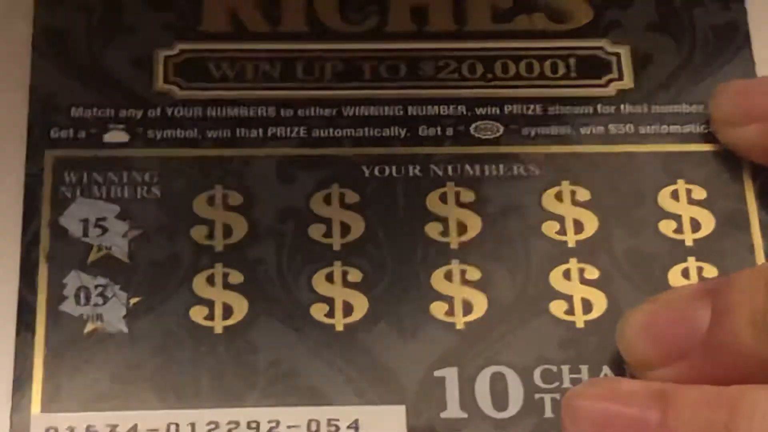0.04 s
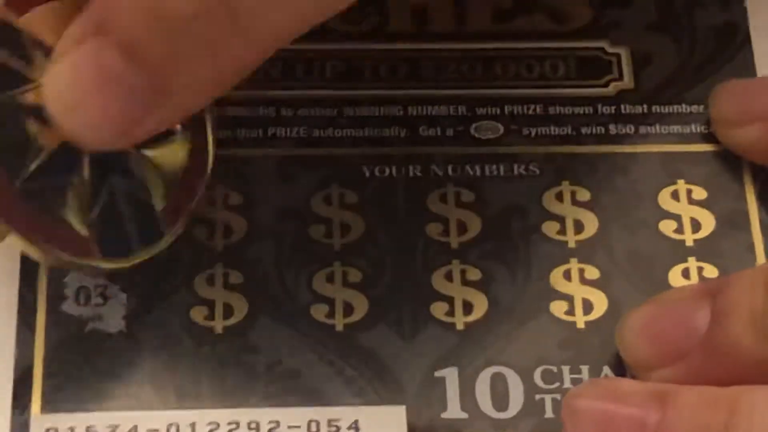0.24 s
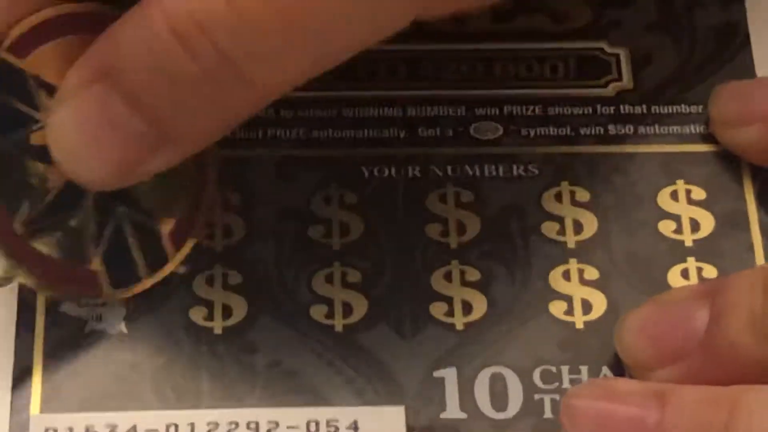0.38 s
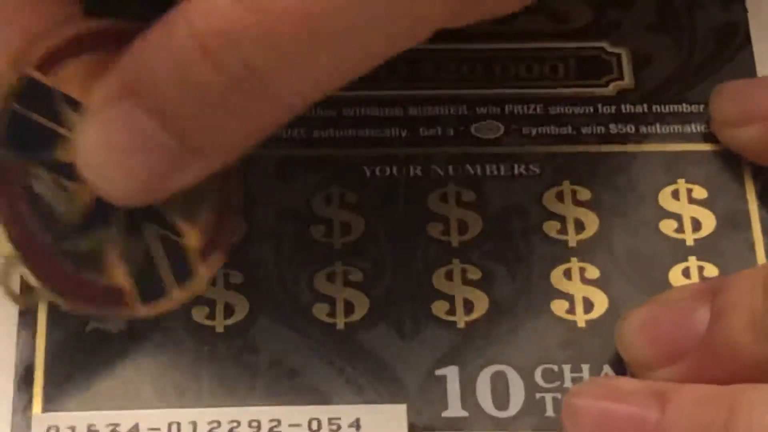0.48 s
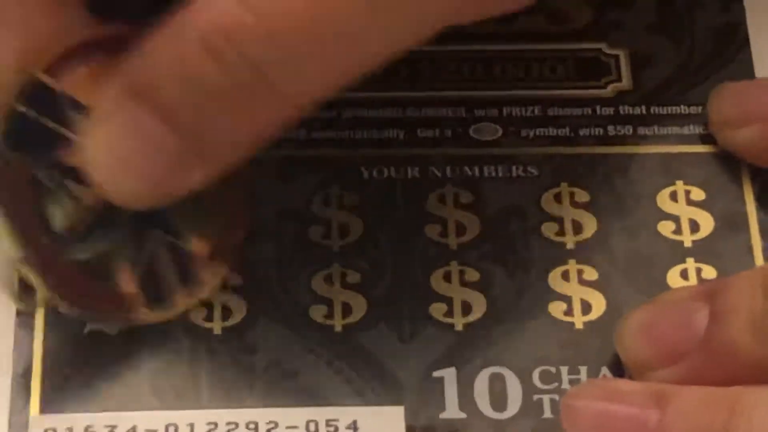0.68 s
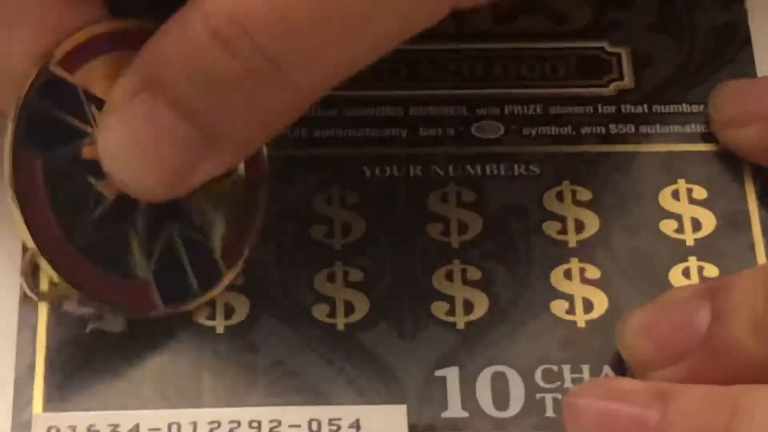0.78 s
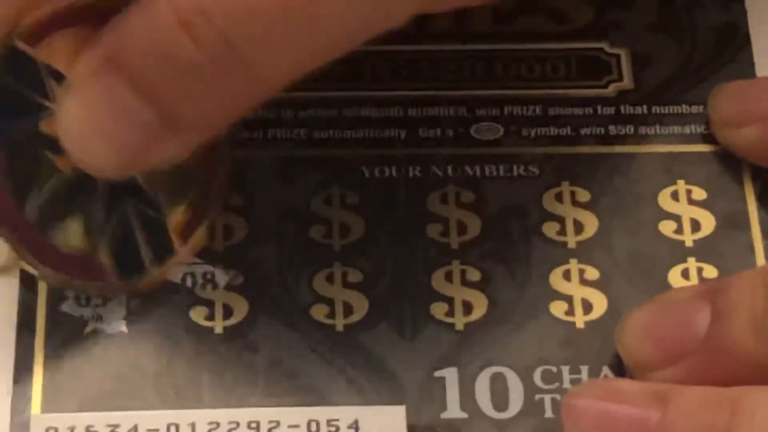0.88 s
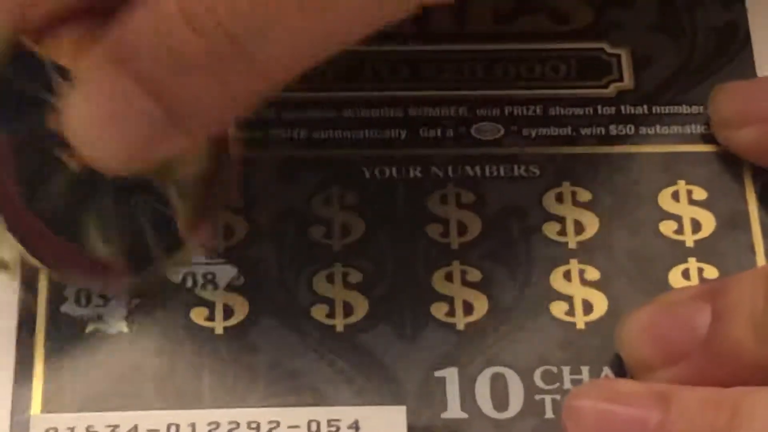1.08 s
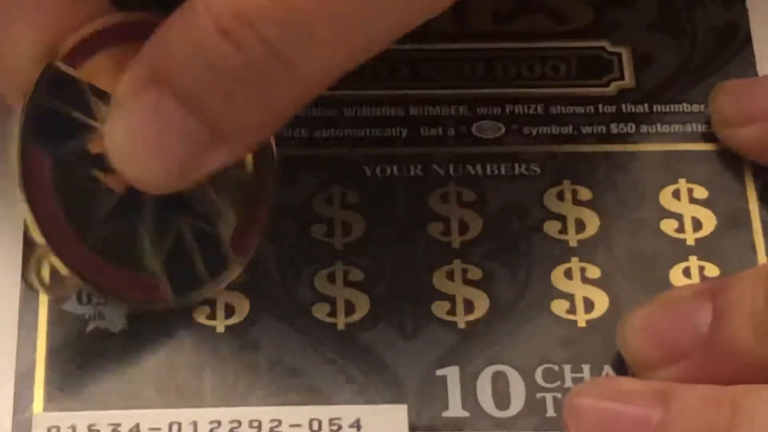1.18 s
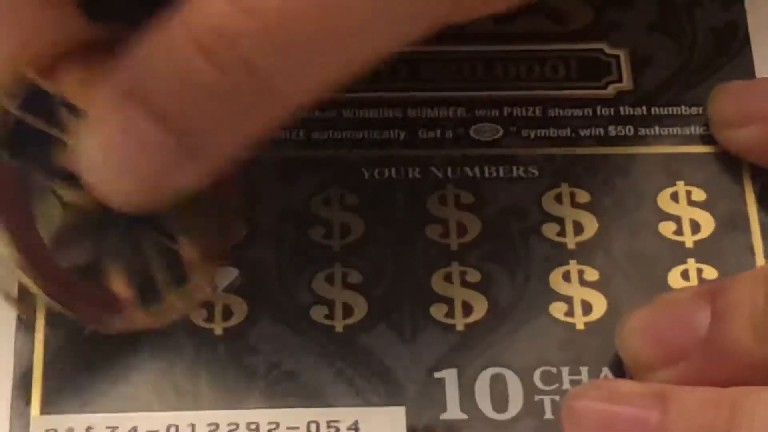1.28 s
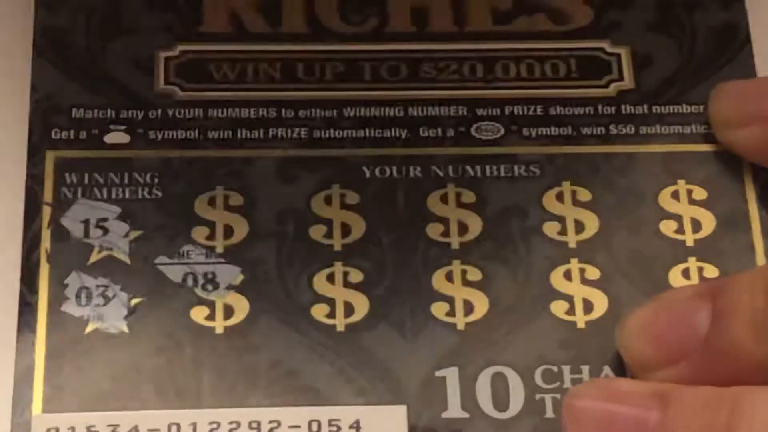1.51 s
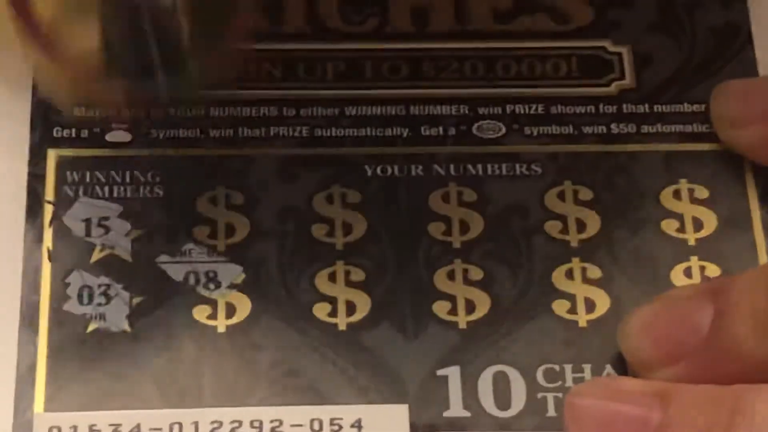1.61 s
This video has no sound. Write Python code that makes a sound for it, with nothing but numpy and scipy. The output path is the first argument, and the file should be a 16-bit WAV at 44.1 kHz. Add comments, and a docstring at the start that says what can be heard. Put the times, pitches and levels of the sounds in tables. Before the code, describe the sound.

Coin scraping on card: after a moment of quiet room hum comes a sharp tap, then rapid uneven rasps with small ticks, then faint sliding over paper, heard close up in a small room.

```python
"""A steady room hum with a faint narrow drone is heard first; then a large coin, held under a thumb,
taps down on a paper card lying on a table and scrapes it in quick short strokes, with soft slides later.
Hum and slides are filtered noise; taps are decaying noise bursts and pulses sent through resonances.
In the strokes, dense grains of friction ring the damped coin, the card and the table;
a small room answers taps, strokes and slides with a tail of decaying noise."""
import sys
import numpy as np
from scipy import signal
from scipy.fft import rfft, irfft, next_fast_len
from scipy.io import wavfile
from scipy.ndimage import uniform_filter1d, map_coordinates

SR = 44100
rng = np.random.default_rng(int(sys.argv[2]) if len(sys.argv) > 2 else 0)


def unload_wav(signal):
    """Save mono or channel-first audio to the path in sys.argv[1] as 16-bit WAV at rate SR, clipped to [-1, 1]."""
    wavfile.write(
        sys.argv[1],
        SR,
        np.round(np.clip(np.atleast_2d(signal).T, -1, 1) * 32767).astype(np.int16),
    )


N = 72765

# Spectrum of the room's steady background: [f/Hz, relative level/dB per Hz]
HUM_SPECTRUM = [(15, -53), (30, -18), (60, -1), (130, 0), (180, -14), (250, -2.5), (450, -12), (800, -6.5),
                (1200, -12.5), (2000, -21.5), (3500, -31), (8000, -37.5), (16000, -42.5)]
# Narrow steady band, resonance applied twice: [f/Hz, width/Hz, level/dB]
DRONE_MODE = [(645.6, 20, 0)]
# Taps and ticks of the coin: [t/s, table level/dB, card level/dB, knock level/dB, crack level/dB];
# table and card levels are those before the blow is doubled
TAPS = [(0.2406, -47.5, -25, -19.5, -30.5), (0.252, -80, -31.5, -83, -65), (0.597, -70, -54, -45, -53),
        (0.621, -55.5, -53, -66, -55), (0.645, -73, -76, -54, -55), (0.825, -58, -50, -47, -69),
        (0.844, -59, -79, -75, -53.5), (1.027, -70, -73, -73, -75), (1.0516, -90, -69, -87, -52.5),
        (1.075, -57, -74, -64, -55), (1.089, -66, -56, -72, -74), (1.1347, -68, -77, -77, -53),
        (1.293, -98, -83, -62, -64), (1.519, -69, -63, -88, -52.5), (1.5943, -60.5, -93, -53, -59)]
# Dull body of a blow, resonances applied twice: [f/Hz, width/Hz, level/dB, counting double]
KNOCK_MODES = [(420, 167, 3.5), (1120, 1340, 0), (1970, 810, 3), (4640, 930, -10)]
# Spectrum of the sharp crack of a blow: [f/Hz, level/dB]
CRACK_SPECTRUM = [(1500, 4), (3000, 5), (4500, -0.5), (8000, -9), (13000, -5.5), (16000, -17.5)]
# Decay of the room's answer: [f/Hz, t60/s]
ROOM_T60 = [(100, 0.31), (1000, 0.18), (4000, 0.31), (14000, 0.12)]
# Colour of the room's answer, hollowed around 6 kHz and brighter again at the top: [f/Hz, level/dB]
ROOM_COLOUR = [(300, 1.5), (2500, -1), (6000, -12), (15000, -2.5)]
# Strokes: [start t/s, length/s, place of peak speed/0-1, delay until the coin's edge bites/s,
# then level/dB of table, card, card edge, coin's lowest mode, coin's upper modes]
STROKES = [(0.302, 0.042, 0.05, 0.0021, -52.5, -46.5, -64.5, -62.5, -66.5),
           (0.388, 0.07, 0.07, 0.00043, -48.5, -45.5, -49.5, -58, -57),
           (0.491, 0.057, 0.53, 0.0013, -55.5, -48, -58, -54.5, -56.5),
           (0.543, 0.023, 0.13, 0.0022, -76, -47.5, -59, -52, -56),
           (0.59, 0.024, 0.22, 0.0015, -55.5, -49.5, -49, -57, -56),
           (0.613, 0.049, 0.12, 0.0048, -50, -48.5, -49.5, -56, -60),
           (0.702, 0.066, 0.53, 0.002, -52.5, -47, -54.5, -49, -51),
           (0.781, 0.079, 0.88, .01, -58.5, -50.5, -59.5, -69, -67.5),
           (0.899, 0.078, 0.58, 0.006, -53, -45.5, -54.5, -50, -51),
           (1.017, 0.062, 0.67, 0.0054, -53, -47.5, -57.5, -64, -66.5),
           (1.118, 0.072, 0.77, 0.0017, -61.5, -56.5, -69, -67, -73.5),
           (1.212, 0.061, 0.35, 0.0098, -50, -45, -49.5, -56, -58)]
# Resonances of the table: [f/Hz, width/Hz, level/dB]
TABLE_MODES = [(81, 34, -11), (129.6, 8.8, -2.5), (225.4, 17.8, 3), (324, 40.6, -1.5), (402.5, 52, -3.5),
               (524, 30, -5.5)]
# Resonances of the card: [f/Hz, width/Hz, level/dB]
CARD_MODES = [(659, 27, -1.5), (837, 64, -1), (955, 130, 1.5), (1043, 80, 6.5), (1100, 108, 0),
              (1228, 94, 0.5), (1320.4, 63, 2), (1501, 28, -5), (1663, 216, -12), (1964, 142, -7)]
# Resonances of the card's edge: [f/Hz, width/Hz, level/dB]
EDGE_MODES = [(2038, 184, 1), (2540, 80, -2), (2752, 80, 5), (2970, 400, -1)]
# Lowest resonance of the damped coin: [f/Hz, width/Hz, level/dB]
COIN_LOW_MODES = [(3377, 164, 0)]
# Upper resonances of the coin, applied twice: [f/Hz, width/Hz, level/dB, counting double]
COIN_UPPER_MODES = [(4540, 386, 2), (5650, 100, -1.5), (6333, 570, -1), (7546, 440, 2.5), (8120, 840, -1.5),
                    (10030, 250, -1), (10620, 560, -1), (12560, 790, 0.5), (13160, 990, -1),
                    (15750, 480, -5)]
# How steeply each part follows the speed, in the order of the stroke levels: [exponent]
SHARPNESS = [0.78, 0.89, 1.44, 1.15, 1.45]
# How long each part trails the stroke: [lag/s]
LAG_S = [0.0086, 0.001, 0.0038, 0.0024, 0.00068]
# Time added before and after; heavier parts answer already to slow movement: [time/s]
WIDEN_S = [0.007, 0.0034, 0.0033, 0.0027, 0.00085]
# Soft slides over the paper: [start t/s, length/s, place of peak speed/0-1, level/dB]
SLIDES = [(1.296, 0.049, 0.55, -67), (1.327, 0.23, 0.54, -62), (1.612, 0.065, 0.47, -62.5)]
# Spectrum of the slides: [f/Hz, level/dB]
SLIDE_SPECTRUM = [(200, 13), (1000, -0.5), (3000, 0), (6000, -6.5), (16000, -13)]

HUM_DB, HUM_PATCHY_DB, DRONE_DB = -59, 1.5, -69.5  # patchiness is an rms deviation
CONTACT_DECAY_S = 0.0025  # time constant of the force of a blow
KNOCK_RISE_S, KNOCK_T60_S, CRACK_T60_S = 0.0009, 0.032, 0.009
ROOM_DB = -8.5
GRAINS_PER_S, GRAIN_SPREAD_DB = 12000, 2.5  # mean rate, mean of the exponential spread
CATCH_DB, CATCH_PER_S = 1.8, 140  # depth and knot rate of the uneven friction
TOP_HZ = 15800


def amp(db):
    """Definition of level: 20 dB is a factor of ten in amplitude."""
    return 10 ** (np.asarray(db) / 20)


def unit(x):
    """Normalization to a root-mean-square value of 1."""
    return x / np.sqrt(np.mean(x ** 2) + 1e-20)


def along(points, hz):
    """Linear interpolation of (f/Hz, value) points on a logarithmic frequency axis."""
    f, values = np.transpose(points)
    return np.interp(np.log(hz + 1), np.log(f + 1), values)


def filtered(x, response):
    """Linear filtering: the spectrum of x is multiplied by a response of frequency."""
    m = next_fast_len(N + SR // 2)
    hz = np.fft.rfftfreq(m, 1 / SR)
    return irfft(rfft(x, m) * response(hz), m)[..., :N]


def coloured(spectrum):
    """Spectral shaping: white noise is filtered to this spectrum and set to rms 1."""
    return unit(filtered(rng.standard_normal(N), lambda hz: amp(along(spectrum, hz))))


def ring(x, modes, order=1):
    """Modal superposition: damped resonances add with alternating sign; white noise keeps its level."""
    def body(f):
        total = 0
        for k, (centre, width, db) in enumerate(modes):
            damping = 1j * f * width
            total = total + (-1) ** k * amp(db) * damping / (centre * centre - f * f + damping)
        return total ** order

    gain = np.sqrt(np.mean(abs(body(np.linspace(0, SR / 2, num=8192))) ** 2))
    return filtered(x, body) / gain


def hum():
    """Stationary noise: a coloured background, a little patchy, plus narrow-band resonant noise."""
    z = signal.stft(coloured(HUM_SPECTRUM), nperseg=512)[2]
    patches = rng.standard_normal(z.shape)
    patches = uniform_filter1d(patches, size=4, axis=0)  # over frequency
    patches = uniform_filter1d(patches, size=6, axis=1)  # over time
    patchy = z * amp(HUM_PATCHY_DB * unit(patches))
    air = unit(signal.istft(patchy, nperseg=512)[1][:N])
    drone = ring(rng.standard_normal(N), DRONE_MODE, order=2)
    return amp(HUM_DB) * air + amp(DRONE_DB) * drone


def taps():
    """Impact excitation: brief forces ring table and card, with a dull knock and a sharp crack."""
    t = np.arange(N) / SR
    after = [np.where(t >= tap[0], t - tap[0], 1e3) for tap in TAPS]  # 1e3 s: silent before a tap

    def dying(column, t60):
        return sum(amp(tap[column] - 60 * a / t60) for tap, a in zip(TAPS, after))

    def blow(column):
        return sum(amp(tap[column]) * np.exp(-a / CONTACT_DECAY_S) for tap, a in zip(TAPS, after))

    # restarts from zero at every tap
    rising = np.prod([1 - np.exp(-a / KNOCK_RISE_S) for a in after], axis=0)
    knock_noise = rising * dying(column=3, t60=KNOCK_T60_S) * rng.standard_normal(N)
    knock = ring(knock_noise, KNOCK_MODES, order=2)
    crack = dying(column=4, t60=CRACK_T60_S) * coloured(CRACK_SPECTRUM)
    table = ring(2 * blow(column=1), TABLE_MODES)
    card_noise = rising * blow(column=2) * rng.standard_normal(N)
    card = ring(2 * card_noise, CARD_MODES)
    return knock + crack + table + card


def room(x):
    """Reverberation: convolution with a noise tail whose decay time depends on frequency."""
    hz, t, z = signal.stft(rng.standard_normal(SR // 2), SR, nperseg=256)
    level_db = along(ROOM_COLOUR, hz)[:, None] - 60 * t / along(ROOM_T60, hz)[:, None]
    tail = signal.istft(z * amp(level_db), SR, nperseg=256)[1]
    return signal.fftconvolve(x, tail / np.linalg.norm(tail))[:N]


def speed(start, length, peak):
    """Kinematics of a hand movement: speed rises to 1 at its peak place, then falls to rest."""
    place = (np.arange(N) / SR - start) / length
    return np.sin(np.pi / 2 * np.interp(place, [0, peak, 1], [0, 1, 0]))


def wobble(rate):
    """Random modulation: a smooth curve through random knots, rate knots a second."""
    return map_coordinates(rng.standard_normal(N // 50), [np.arange(N) * rate / SR])


def friction_grains():
    """Friction as shot noise: random impulses of spread size and either sign, with a wandering level."""
    present = rng.random(N) < GRAINS_PER_S / SR
    size = amp(GRAIN_SPREAD_DB * rng.exponential(size=N))
    grains = unit(present * rng.standard_normal(N) * size)
    return grains * amp(CATCH_DB * wobble(CATCH_PER_S))


def strokes():
    """Forced vibration: the same friction grains drive each part at a level following the speed."""
    grains = friction_grains()
    out = 0
    parts = [TABLE_MODES, CARD_MODES, EDGE_MODES, COIN_LOW_MODES, COIN_UPPER_MODES]
    for k, modes in enumerate(parts):
        push = 0
        for start, length, peak, bite, *db in STROKES:
            delay = bite if k >= 2 else 0  # card edge and coin wait for the bite
            begin = start + delay + LAG_S[k] - WIDEN_S[k]
            lasting = length - delay + 2 * WIDEN_S[k]
            push = push + amp(db[k]) * speed(begin, lasting, peak) ** SHARPNESS[k]
        out = out + ring(push * grains, modes, order=2 if modes is COIN_UPPER_MODES else 1)
    return out


def slides():
    """Light sliding friction: a soft broad hiss follows the speed of something dragged over the paper."""
    push = sum(amp(db) * speed(start, length, peak) for start, length, peak, db in SLIDES)
    return push * coloured(SLIDE_SPECTRUM)


def scene():
    """Superposition: direct sound, the room's answer to it, and the hum."""
    near = strokes() + taps() + slides()
    return (near + amp(ROOM_DB) * room(near) + hum())[None]


def record(dry):
    """Band limitation: nothing is kept at or above the limiting frequency."""
    return filtered(dry, lambda hz: hz < TOP_HZ)


dry = scene()
out = record(dry)
unload_wav(out)
```